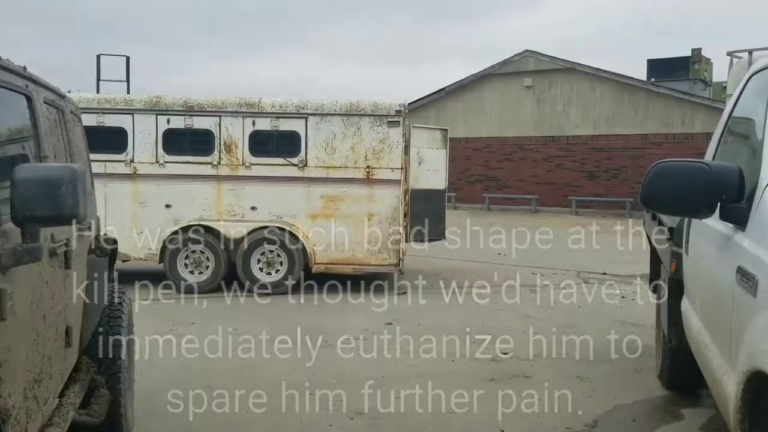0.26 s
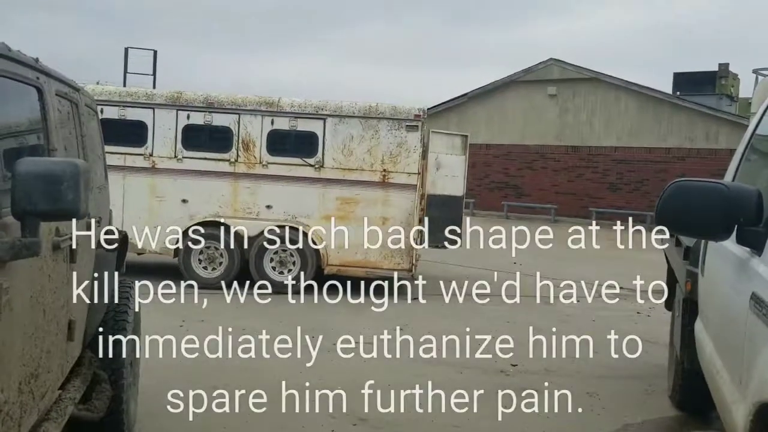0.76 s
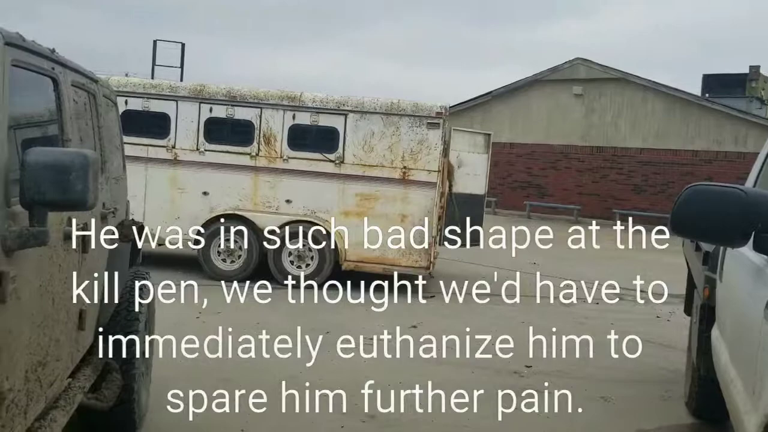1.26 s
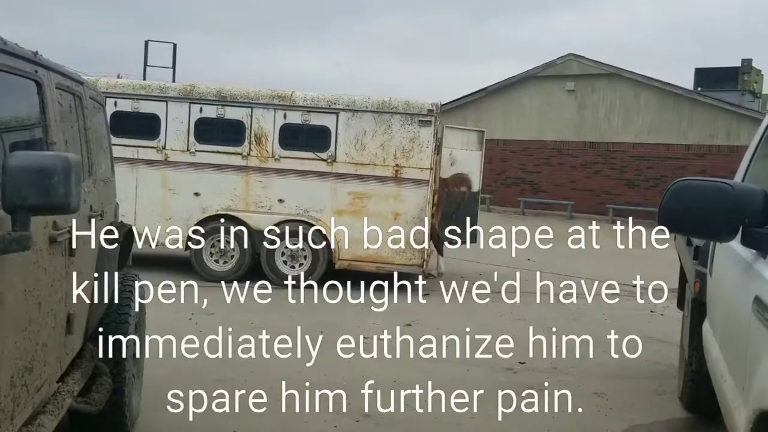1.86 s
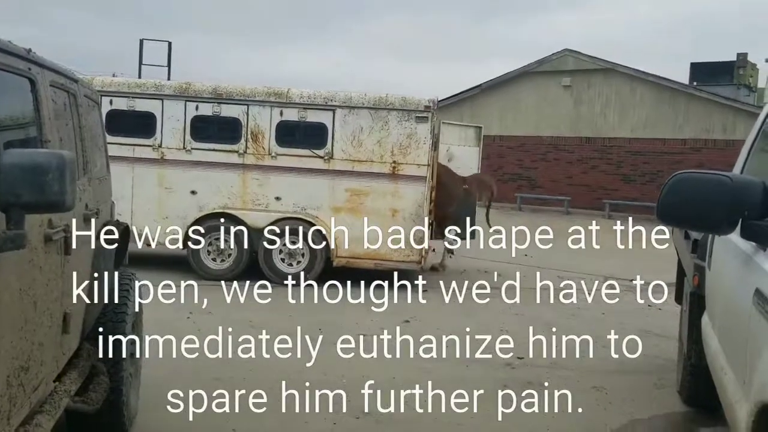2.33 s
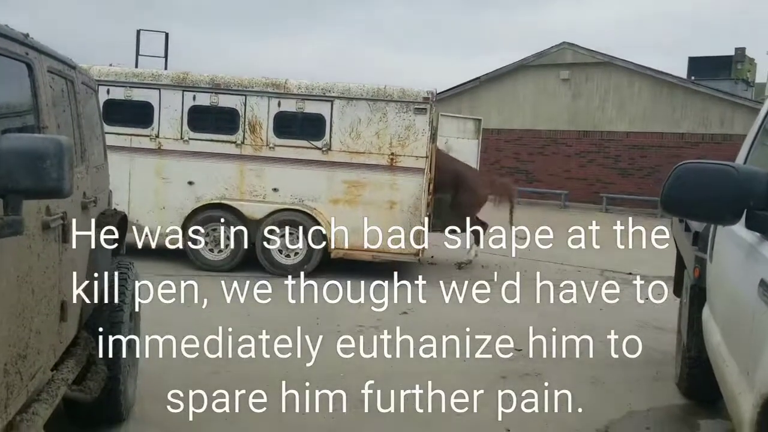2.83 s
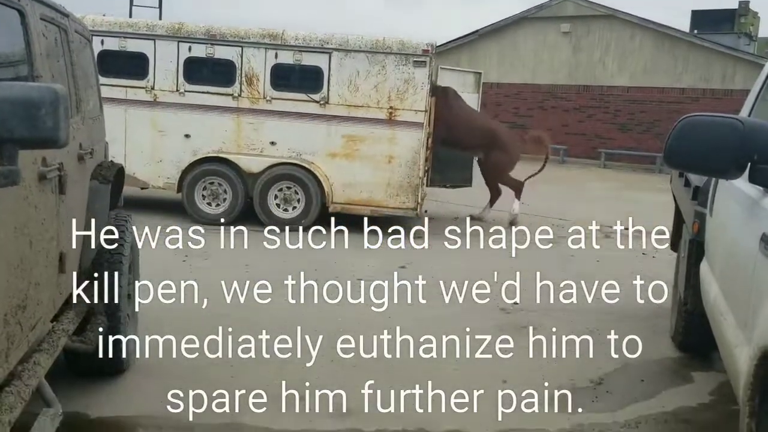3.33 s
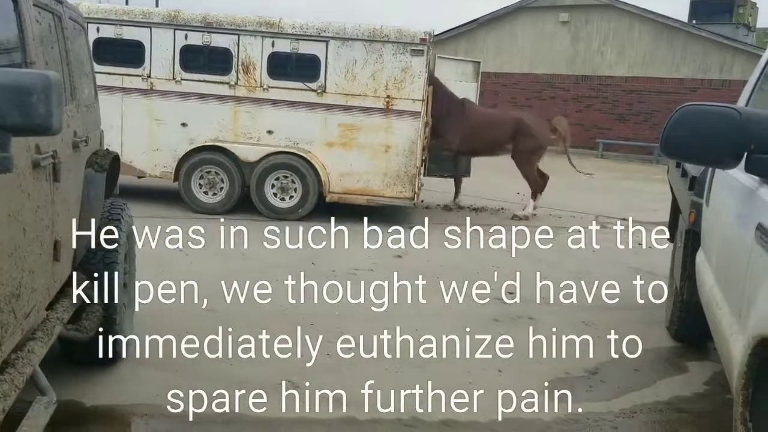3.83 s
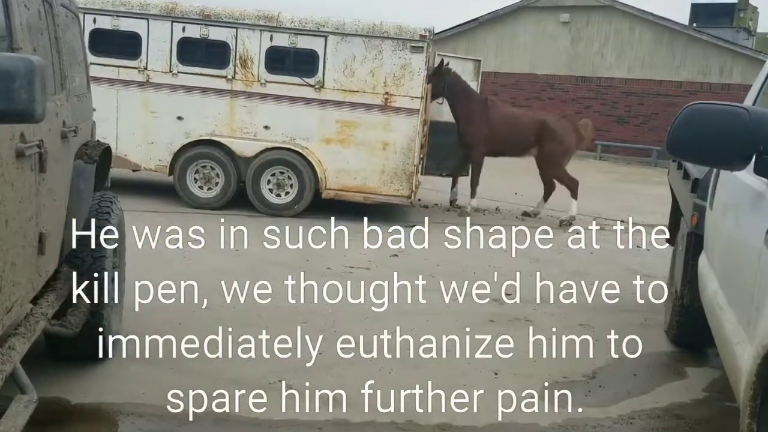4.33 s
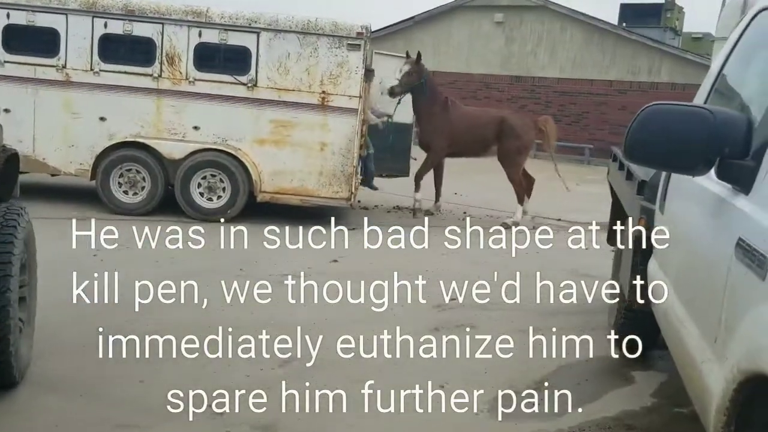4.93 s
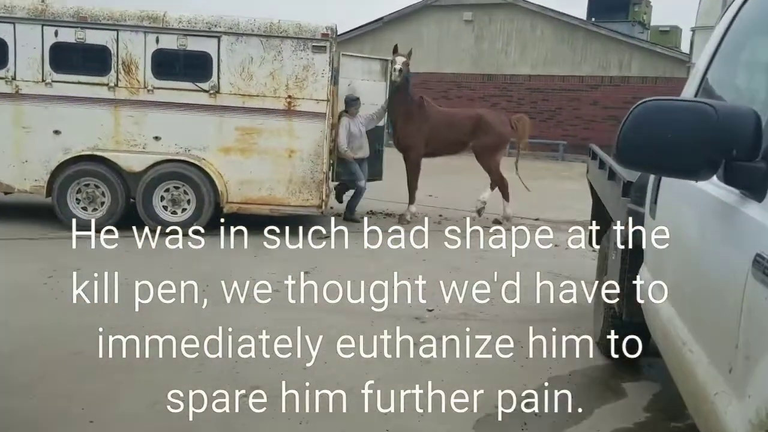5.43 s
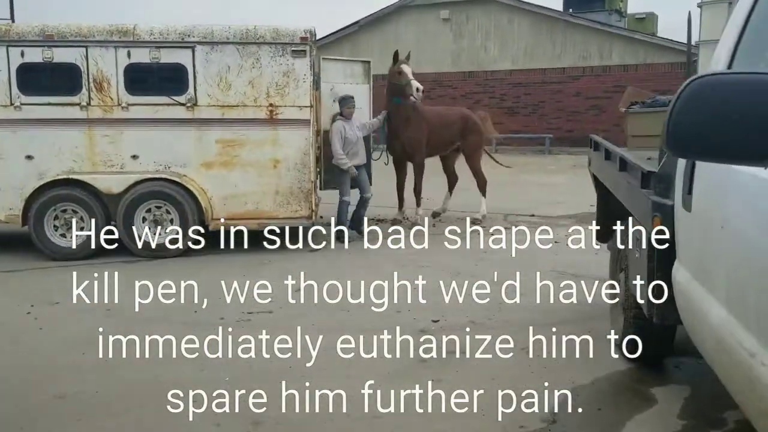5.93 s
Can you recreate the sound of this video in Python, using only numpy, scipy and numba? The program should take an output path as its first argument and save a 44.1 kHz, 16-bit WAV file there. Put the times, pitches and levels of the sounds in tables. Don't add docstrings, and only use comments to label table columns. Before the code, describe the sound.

Handheld phone in an open yard with a faint engine idle and thin hiss. Hooves knock on a trailer floor, with one hard double bang on metal panels near one second and latch clinks. A horse to the left squeals, breaks into a shaken trill and sinks to a low fluttering nicker. After a pause, a second horse ahead whinnies, still calling at the cut.

```python
import sys
import numpy as np
from scipy import signal
from scipy.fft import rfft, irfft
from scipy.io import wavfile
from scipy.ndimage import uniform_filter1d
from numba import njit

SR = 44100
rng = np.random.default_rng(int(sys.argv[2]) if len(sys.argv) > 2 else 0)


def to_wav(s):
    ch = np.atleast_2d(s).T
    pcm = np.round(np.clip(ch, -1, 1) * 32767)
    wavfile.write(sys.argv[1], SR, pcm.astype(np.int16))


def voltage_ratio(level):
    return 10 ** (np.asarray(level, float) / 20)


N = 273067


def unit(x):
    return x / np.sqrt(np.mean(x ** 2))


def curves(table):
    s, *columns = np.transpose(table)
    return [np.interp(np.arange(N) / SR, s, c) for c in columns]


@njit
def svf(x, hz, width):
    y, b, l = np.empty(len(x)), 0., 0.
    for i in range(len(x)):
        g, k = np.tan(np.pi * hz[i] / SR), width / hz[i]
        v = (b + g * (x[i] - l)) / (1 + g * (g + k))
        b, l, y[i] = 2 * v - b, l + 2 * g * v, k * v
    return y


def band(x, hz, width):
    hz = hz * np.ones(N)
    once = svf(x, hz, 1. * width)
    return unit(svf(once, hz, 1. * width))


def colour(points, size):
    f = np.arange(size // 2 + 1) * SR / size + 1
    hz, db = np.transpose(points)
    gain = voltage_ratio(np.interp(np.log(f), np.log(hz), db))
    return unit(irfft(rfft(rng.standard_normal(size)) * gain, size))


def walk(rate, size=N):
    k = int(SR / rate)
    steps = np.repeat(rng.standard_normal(size // k + 1), k)
    return 1.314 * uniform_filter1d(uniform_filter1d(steps, k), k)[:size]


def late(x, samples):
    return irfft(rfft(x) * np.exp(-2j * np.pi * samples * np.arange(N // 2 + 1) / N), N)


def ports(x, lag, pan_db, echoes):
    sides = (x * voltage_ratio(pan_db / 2), late(x, lag) * voltage_ratio(-pan_db / 2))
    return np.array([side + late(side, d) * voltage_ratio(db) for side, (d, db) in zip(sides, echoes)])


# time in seconds, rumble in dB, idle note in dB.
ENGINE = [
    (0, -40.5, -6.5),
    (.8, -43, -5),
    (1.25, -42, 8),
    (1.45, -45.5, -2.5),
    (3.3, -46, 0.5),
    (4.7, -54.5, -4),
    (5.15, -53, -4),
    (5.6, -50.5, 9.5),
    (6.19, -53.5, 9.5),
]
# frequency in Hz, level in dB.
RUMBLE = [(15, -46), (25, -33), (36, -24.5), (54, -8), (120, -1.5), (279, -11), (314, -18), (348, -21.5),
          (400, -23), (520, -72), (880, -120)]
# frequency in Hz, level in dB.
HISS = [(150, -8), (220, -2.5), (400, -12), (1100, -13.5), (2200, -21), (3200, -33), (5000, -38.5),
        (7700, -40.5), (8300, -54.5), (14500, -43.5)]
# time in seconds, pitch in Hz, tone in dB, rubbing noise in dB.
SQUEAL = [
    (0, 5800, -58, -64),
    (.15, 5820, -55, -63),
    (.3, 5814, -44, -69),
    (.42, 5790, -60, -59),
    (.65, 5830, -83, -82),
]


def yard():
    t = np.arange(N) / SR
    rumble_db, note_db = curves(ENGINE)
    idle_note = band(rng.standard_normal(N), 79.6, 12.0)
    rumble = colour(RUMBLE, N) * voltage_ratio(2 * walk(3)) + voltage_ratio(note_db) * idle_note
    rumble = rumble * voltage_ratio(rumble_db)

    hz, tone_db, rub_db = curves(SQUEAL)
    tone = band(rng.standard_normal(N), hz, 45) * voltage_ratio(tone_db - 3)
    rub = band(rng.standard_normal(N), 3900, 1000) * voltage_ratio(rub_db)
    squeal = (tone + rub) * (t < .7)

    hiss_db = -47 + 0.84 * (rumble_db + 46.0)
    common = colour(HISS, N)
    no_lows = signal.butter(1, 500, 'high', fs=SR, output='sos')
    unlike = signal.sosfilt(no_lows, colour(HISS, N))
    hiss = (common + unlike * np.array([[1], [-1]])) * voltage_ratio(hiss_db + walk(5.21))
    low = signal.sosfiltfilt(signal.butter(2, 3500, fs=SR, output='sos'), hiss)
    lull_db = -6 * np.clip((t - 1.9) / 0.097, 0, 1)
    hiss = low + (hiss - low) * voltage_ratio(lull_db)
    return (rumble + squeal + hiss) * voltage_ratio([[1.2], [-1.2]])


def ring(modes, t, stretch):
    hz, db, t60 = np.transpose(modes)[:, :, None]
    level_luck, pitch_luck, phase_luck = rng.standard_normal((3, len(modes), 1))
    decay = np.log(1000) / np.minimum(t60, .5) / stretch
    poles = 2j * np.pi * hz * (1 + 0.0213 * pitch_luck) - decay
    turns = np.cumprod(np.repeat(np.exp(poles / SR), len(t), axis=1), axis=1)
    y = (voltage_ratio(db + 2.6 * level_luck) * np.exp(1j * phase_luck) * turns).imag.sum(0)
    return y / np.sqrt(np.mean(y[:660] ** 2))


# frequency in Hz, level in dB, ring time (60 dB fall) in seconds.
FLOOR_MODES = [(56, -3.5, 0.43), (78.7, 3, 0.21), (115.5, -2, 1), (174, -3, 0.64), (227.6, -4.5, 0.22),
               (285, -8, 0.27)]
# frequency in Hz, level in dB, ring time in seconds.
PANEL_MODES = [(410, -7, 0.54), (560, 0, 0.82), (680, -0.5, 0.87), (800, -34.5, 0.5), (1020, -7, 0.26),
               (1062, 6, 0.66), (1122, -0.5, 0.52), (1360, -20.5, 0.11), (1330, -17, 0.26), (1740, 0, 0.11),
               (1905, 4, 0.13), (2015, -17, 0.61), (2680, -25.5, 0.55), (3110, -19, 0.38)]
# frequency in Hz, level in dB, ring time in seconds.
LATCH_MODES = [(2600, -6, 0.13), (3560, -4, 0.24), (3880, 9.5, 0.07), (4540, -15, .22), (4770, -5, .12),
               (5840, -3, 0.15), (7000, 2.5, 0.12)]
# start in seconds, floor thud in dB, wall panels in dB,
# ring time in seconds.
STAMPS = [(0.418, -26, -26, 0.46), (0.502, -27, -32, 0.16), (0.668, -26.5, -44, 0.21),
          (1.014, -23, -27.5, 0.63), (1.025, -25, -23.5, .13), (1.034, -20, -12, 0.29),
          (1.039, -32, -11, 0.11), (1.049, -17.5, -21.5, .12), (1.567, -22, -25.5, 0.49),
          (1.683, -23, -27, .15), (1.775, -27.5, -35, 0.13), (1.81, -26, -37, 0.18),
          (2.193, -27, -32.5, 0.42), (2.25, -33, -42, 0.48), (2.292, -24.5, -30.5, 0.038),
          (2.503, -34, -48, 0.2), (2.544, -33, -35, 0.063), (2.597, -22.5, -28, .22),
          (2.844, -30, -33.5, 0.062), (3.085, -28.5, -28, 0.3), (3.14, -24, -34.5, 0.18),
          (3.323, -25.5, -35.5, .11), (3.767, -31, -25, 0.16), (4.873, -37, -43, .19),
          (5.61, -36, -50, .11), (5.938, -29.5, -53, 0.087)]
# start in seconds, latch and grit in dB,
# wall panels in dB, ring time in seconds, rise time in ms.
RATTLES = [(0.707, -46.5, -43, 0.18, 0.86), (1.034, -38, -24.5, 0.43, 0.76), (1.569, -40, -49, 0.46, .6),
           (1.611, -25, -28.5, 0.37, 0.85), (1.73, -52.5, -34, 0.8, 7), (1.776, -49, -40, 0.56, 0.77),
           (2.268, -42, -53, 0.42, 10.4), (2.725, -43.5, -63, 0.32, .6), (4.304, -51, -37, .06, 0.65),
           (4.528, -25, -49, 0.25, 10.6), (4.589, -49, -47, 0.045, .6), (4.8, -57, -55, 0.28, 7.9),
           (4.875, -60.5, -67.5, 0.53, 0.79), (5.097, -57, -61, 0.14, 0.91), (5.15, -51.5, -62, 0.79, 12),
           (5.28, -43, -65, 0.34, 10)]


def trailer():
    out, t = np.zeros((2, N + SR)), np.arange(20000) / SR
    blows = [(s, thud_db, db, db - 29, t60, 0.38) for s, thud_db, db, t60 in STAMPS]
    blows += [(s, db, db, latch_db, t60, ms) for s, latch_db, db, t60, ms in RATTLES]
    crack = voltage_ratio(4) * np.sin(2 * np.pi * 1900 * t) * np.exp(-t / .0011)
    for s, thud_db, panel_db, latch_db, t60, rise_ms in blows:
        rise = 1 - np.exp(-(1000 * t / rise_ms) ** 2)
        fade = 1000 ** (-t / t60)
        clatter = voltage_ratio(2.5 * walk(150, size=len(t)))
        thud = ring(FLOOR_MODES, t, 4 * t60) * voltage_ratio(thud_db - 7.5)
        rattle = colour([(200, -0.5), (600, 13), (1800, 3.0), (3000, -16.0), (6000, -49.0)], len(t))
        k = int(s * SR)
        for ch, gain_db in enumerate((1.0, -1.0)):
            own = colour([(400, -16.0), (1500, 7.5), (2500, -2.5), (6000, -42.0)], len(t))
            panel = 0.66 * ring(PANEL_MODES, t, 1.84 * t60)
            panel = panel + (0.91 * rattle + 0.5 * own) * fade * clatter + crack
            grit = colour([(1500, -9.0), (3500, -3.5), (7000, -9.0), (8500, -16 + rise_ms),
                           (14500, -22 + 0.82 * rise_ms)], len(t))
            latch = .55 * ring(LATCH_MODES, t, 2.2 * t60)
            latch = latch + .75 * grit * clatter * (fade ** 2.2 + .12 * fade ** .75)
            blow = thud + panel * voltage_ratio(panel_db - 5.0) + latch * voltage_ratio(latch_db + 5.0 + 2 * gain_db)
            out[ch, k:k + len(t)] += blow * rise * voltage_ratio(gain_db)
    return out[:, :N]


# start in seconds, peak in dB, centre in Hz.
TICKS = [(0.418, -27, 3020), (0.503, -40, 996), (0.685, -41, 5500), (0.707, -20.5, 2700),
         (0.7075, -29, 6560), (1.684, -18, 1500), (1.776, -22, 2200), (1.783, -40, 5500),
         (2.293, -28, 1800), (4.305, -18, 2800), (4.427, -32, 2503), (4.588, -28, 3000), (4.874, -54, 2980),
         (5.149, -37, 2515)]


def ticks():
    out, t = np.zeros(N + SR), np.arange(400) / SR
    for s, db, hz in TICKS:
        k = int(s * SR)
        out[k:k + len(t)] += voltage_ratio(db - 3) * np.sin(2 * np.pi * hz * t) * np.exp(-t / .0007)
    return out[:N] * voltage_ratio([[1.0], [-1.0]])


def walls(x, t60, wet_db):
    t = np.arange(SR // 2) / SR
    sides = []
    for _ in range(2):
        tail = colour([(60, -10.0), (300, 8.0), (2000, -2.5), (5000, -10.5), (12000, -12.5)], len(t))
        tail = tail * 1000 ** (-t / t60) * (t > .012)
        sides.append(signal.fftconvolve(x, tail / np.sqrt(np.sum(tail ** 2)))[:N])
    return np.array(sides) * voltage_ratio(wet_db)


def heave_flanks(hz, heaves, pull, start, square, sag):
    hoot, dip, rise_db, stolen = np.zeros((4, N))
    wobble = .07 * walk(75)
    kept, lock_hz, weak_s, drop, spread = pull
    for s, half, hoot_hz, hoot_db, up_db in heaves:
        near = slice(int((s - .15) * SR), min(int((s + .3) * SR), N))
        t = np.arange(near.start, near.stop) / SR - s
        heave = np.exp(-np.abs(t / half / spread) ** square)
        puff = np.exp(-np.abs(t / half) ** 5)
        stolen[near] += puff * np.clip((hoot_db + 43.5) / 18, 0, 1)
        reach = np.clip((half - weak_s) / .003, 0, 1)
        recovery = np.exp(-np.maximum(t - half, 0) / .06) * (t > 0)
        hz[near] -= reach * drop * (s - start) ** 2 * recovery
        hz[near] += reach * heave * (kept * hz[near] + lock_hz - hz[near])
        dip[near] += heave
        rise_db[near] += up_db * puff
        tired = sag * (s - start) ** 2 * max(hoot_hz - 250, 0)
        bent_hz = hoot_hz - tired * (2.5 * np.clip(t, -.1, .1) + wobble[near])
        turn = 2 * np.pi * np.cumsum(bent_hz) / SR
        tone = np.sin(turn) + np.sin(2 * turn) * (250 / hoot_hz) ** 3
        hoot[near] += puff * voltage_ratio(hoot_db) * tone * np.sqrt(2)
    return hz, hoot * voltage_ratio(2.5 * walk(90)), dip, rise_db, stolen


def whistle_tone(hz, loss_db, dip, mouth, overtones_db, flutter_db):
    phase = 2 * np.pi * np.cumsum(hz) / SR
    mouth_hz, mouth_db = np.transpose(mouth)
    whistle = 0
    for k, db in enumerate(overtones_db):
        patchy_db = flutter_db * (.8 + .7 * (k > 0)) * walk(40)
        passed_db = np.interp((k + 1) * hz, mouth_hz, mouth_db)
        level_db = db - k * (loss_db + dip) + passed_db + patchy_db
        whistle = whistle + voltage_ratio(level_db) * np.sin((k + 1) * phase)
    return np.sqrt(2) * whistle


def fold_slaps(growl_hz):
    gap_luck, level_luck = rng.standard_normal((N // 40, 2)).T
    at = np.cumsum(SR / growl_hz * np.exp(.4 * gap_luck)).astype(int)
    slaps = np.zeros(N)
    slaps[at[at < N]] = voltage_ratio(3.5 * level_luck[at < N])
    return slaps, unit(signal.lfilter([1], [1, -.99], slaps))


def throat_noise(slaps, chop, breath_db, growl_db, dip, rise_db, throat, notches, squeeze, gust):
    air = rng.standard_normal(N) * (.85 + chop * .35)
    puffs = .8 * unit(slaps) + (.2 + chop) * rng.standard_normal(N)
    noise = 0
    for f, w, air_db, puff_db in throat:
        centre = f * (1 + squeeze * (dip - .4) + .014 * walk(30))
        lift = voltage_ratio(rise_db * (1 + gust * (f > 5000)) + 4.1 * walk(35))
        noise = noise + lift * voltage_ratio(air_db + breath_db) * band(air, centre, w + .018 * f)
        noise = noise + lift * voltage_ratio(puff_db + growl_db - 7) * band(puffs, centre, 1.25 * w + .045 * f)
    for f, w in notches:
        noise = noise - svf(noise, f * (1 + 0.013 * walk(35)), 1. * w)
    return noise


def horse(call, airflow, heaves, pull, throat, mouth, overtones_db, notches, square, dip_db, flutter_db,
          growl_hz, sag, squeeze, gust, hush=(0, 0)):
    t = np.arange(N) / SR
    hz, whistle_db, loss_db = curves(call)
    breath_db, growl_db = curves(airflow)
    start, end = airflow[0][0], airflow[-1][0]
    hz, hoot, dip, rise_db, stolen = heave_flanks(hz, heaves, pull, start, square, sag)
    shaky = .0013 + .016 * dip * (dip_db < 0)
    hz = uniform_filter1d(hz, 220) * (1 + shaky * walk(110))
    whistle = whistle_tone(hz, loss_db, dip, mouth, overtones_db, flutter_db)
    whistle = whistle * voltage_ratio(uniform_filter1d(whistle_db, 400) + dip_db * stolen)
    whistle = whistle * (1 + 0.72 * hoot)
    slaps, chop = fold_slaps(growl_hz)
    noise = throat_noise(slaps, chop, breath_db, growl_db, dip, rise_db, throat, notches, squeeze, gust)
    hoot = hoot * ((t < hush[0]) | (t > hush[1]))
    tiredness = np.clip((t - start) / 2, 0, 1) ** 3
    hoot = hoot * (1 + tiredness * (uniform_filter1d(chop, 40) - 1.2) * .7)
    on = (t > start) * np.clip((end + .04 - t) / .04, 0, 1)
    return on * (whistle + hoot + noise)


# time in seconds, pitch in Hz, level in dB,
# dB lost per overtone.
LEFT_SQUEAL = [
    (2.48, 1330, -75, 24.5),
    (2.505, 1400, -37, 7),
    (2.545, 1478, -26, 8),
    (2.575, 1585, -30.5, 3.5),
    (2.62, 1612, -34.5, 1),
    (2.7, 1711, -21.5, 3),
    (2.84, 1776, -19.5, 4.5),
    (2.89, 1764, -18.5, 6),
    (2.93, 1724, -24, 1.5),
    (3.0, 1695, -30, 2.5),
]
# time in seconds, pitch in Hz, level in dB, dB lost per overtone.
LEFT_TRILL = [(3.018, 1584, -23.5, 2.4), (3.039, 1428, -27, 3), (3.105, 1396, -27.5, 2.97),
              (3.149, 1334, -23.5, 7.3), (3.2, 1346, -29, 3.2), (3.25, 1425, -26.5, 3.7),
              (3.3, 1529, -28, 0.38), (3.4, 1740, -19.5, 3.7), (3.51, 1820, -18.5, 4.5),
              (3.63, 1822, -19.5, 4.15), (3.753, 1823, -23, 5.5), (3.89, 1712, -23, 11),
              (4.02, 1574, -20, 7.4), (4.119, 1520, -50, 30)]
# time in seconds, breath in dB, growl in dB.
LEFT_AIR = [(2.48, -67, -77), (2.6, -52.5, -70), (2.95, -46.5, -62), (3.05, -34, -50.5), (3.35, -51.5, -68),
            (3.5, -43.5, -70), (3.65, -32, -48), (3.85, -29, -43), (4.001, -28, -37.5), (4.119, -42, -35.5),
            (4.4, -52, -42.5), (4.6, -58.5, -46), (4.759, -70, -58)]
# centre in seconds, half length in seconds, hoot pitch in Hz,
# hoot level in dB, rise of breath and growl in dB.
LEFT_HEAVES = [(3.153, 0.031, 495, -42, 6), (3.253, 0.024, 498, -52, 14), (3.342, 0.021, 505, -51, 16),
               (3.449, 0.026, 501, -36, 20.5), (3.564, 0.03, 509, -29, 13), (3.69, 0.029, 514.5, -26, 5),
               (3.822, 0.031, 491.3, -22.5, 1), (3.956, 0.039, 430, -24, -3.5),
               (4.009, 0.0053, 560, -41, 0.5), (4.074, 0.0163, 484.5, -30, -1),
               (4.114, 0.022, 331, -34, 0.5), (4.184, 0.049, 458, -30.5, 7), (4.26, 0.017, 290, -37, -1),
               (4.307, 0.0044, 400, -39.5, 11.5), (4.347, 0.035, 421, -35.5, 10.5),
               (4.435, 0.014, 390, -52, 8.5), (4.483, 0.019, 300, -33.5, 12), (4.529, 0.028, 390, -31, 8.5),
               (4.587, 0.013, 400, -37, 7.5), (4.641, 0.03, 400, -40, 4.5), (4.705, 0.055, 252.5, -38, 5.5)]
# share of pitch kept, Hz added, longest heave too weak to pull in
# seconds, later drop in Hz per second squared, width of the pull in heave lengths.
LEFT_PULL = (.88, 0, 0, 0, 1.1)
# frequency in Hz, width in Hz, dB on breath, dB on growl.
LEFT_THROAT = [(290, 250, -28, 2), (452, 240, -25, 5), (1150, 400, -7, 5.5), (1693, 510, -0.5, -16),
               (2120, 154, 3.5, -20), (2935, 35, -2.5, 0.5), (3450, 170, -1, 3), (3240, 140, -3.5, -10.5),
               (3910, 500, -2, -28.5), (4577, 32, -1.5, -19), (5970, 2100, -4.5, -21),
               (11700, 5400, -12.5, -36)]
# frequency in Hz, level in dB.
LEFT_MOUTH = [(1100, -6), (1700, 0.5), (2100, 1.5), (2500, -14.5), (2900, -4), (3500, -0.5), (4300, 10.5),
              (4900, -2.5), (5500, -5.5), (7000, -4.5), (9000, -2), (14000, 7)]
LEFT_OVERTONES_DB = [-1, 5.5, -0.5, 6, -4, -8, -13, -16.5]
# frequency in Hz, width in Hz.
LEFT_NOTCHES = [(2360, 520), (850, 170), (5140, 250)]


def left_horse():
    return horse(LEFT_SQUEAL + LEFT_TRILL, LEFT_AIR, LEFT_HEAVES, LEFT_PULL, LEFT_THROAT, LEFT_MOUTH,
                 LEFT_OVERTONES_DB, LEFT_NOTCHES, square=2.65, dip_db=-12.5, flutter_db=2.38, growl_hz=112,
                 sag=.35, squeeze=-0.027, gust=0.059, hush=(NICKER[0][0], NICKER[-1][0]))


# time in seconds, level in dB.
NOSTRILS = [
    (3.4, -80),
    (3.45, -51),
    (4.0, -51),
    (4.2, -43),
    (4.45, -46),
    (4.6, -58),
    (4.8, -68.5),
    (4.85, -95),
]


def nostrils():
    t = np.arange(N) / SR
    level_db = curves(NOSTRILS)[0] + 1.2 * walk(15)
    hiss = band(rng.standard_normal(N), 11460, 7100) * voltage_ratio(level_db)
    return hiss * (t > NOSTRILS[0][0]) * (t < NOSTRILS[-1][0])


# time in seconds, pitch in Hz, level in dB.
NICKER = [(3.865, 588, -50), (3.889, 577.6, -43), (3.94, 505.5, -22.5), (3.962, 401, -29),
          (3.995, 510.7, -31), (4.036, 584.4, -41.5), (4.068, 500.5, -21.5), (4.09, 299.5, -35),
          (4.12, 249, -40), (4.15, 396.6, -30), (4.185, 484, -28.5), (4.21, 372.2, -31),
          (4.262, 240, -38.5), (4.299, 369, -32), (4.335, 270.5, -35), (4.37, 290, -34.5),
          (4.42, 237.3, -51)]


def nicker():
    t = np.arange(N) / SR
    hz, db = curves(NICKER)
    hz = uniform_filter1d(hz, size=300) * (1 + .07 * walk(70))
    turn = 2 * np.pi * np.cumsum(hz) / SR
    tone = np.sin(turn) + (250 / hz) ** 4 * np.sin(2 * turn)
    rough = voltage_ratio(db + 4 * walk(130))
    return np.sqrt(2) * tone * rough * (t > NICKER[0][0]) * (t < NICKER[-1][0])


# time in seconds, pitch in Hz, level in dB, dB lost per overtone.
AHEAD_WHISTLE = [(5.185, 1080, -50, 24), (5.225, 1374, -38, 28), (5.25, 1704, -16.5, 24),
                 (5.265, 1753, -14, 15), (5.3, 1779, -13.5, 26.4), (5.37, 1804, -38, 4.4),
                 (5.43, 1858, -21.5, 16), (5.48, 1865, -21.5, 7.1), (5.54, 1887, -17.5, 23),
                 (5.6, 1851, -13.5, 33), (5.72, 1945, -11.5, 28), (5.8, 1922, -14, 28),
                 (5.9, 1927, -17.5, 26), (6.02, 1925, -18.5, 33), (6.1, 1930, -21.5, 23),
                 (6.19, 1925, -24, 28)]
# time in seconds, breath in dB, growl in dB.
AHEAD_AIR = [(5.12, -65.5, -59.5), (5.2, -52, -41.5), (5.25, -41.5, -68), (5.45, -33.5, -69),
             (5.56, -31.5, -44), (5.85, -35, -45), (5.95, -40.5, -48), (6.12, -44.5, -49.5),
             (6.19, -43, -42.5)]
# centre in seconds, half length in seconds, hoot pitch in Hz,
# hoot level in dB, rise of breath and growl in dB.
AHEAD_HEAVES = [
    (5.501, .019, 480, -42, 1.6),
    (5.605, .026, 505, -34.5, 2.5),
    (5.722, .036, 516, -31, 4),
    (5.873, .032, 503, -34.5, 4.5),
    (6.013, .042, 520, -35, 6),
    (6.064, .012, 640, -37, 2),
    (6.161, .026, 510, -36, 5),
    (6.178, .018, 290, -35, 1.5),
]
# share of pitch kept, Hz added, longest heave
# too weak to pull in seconds, later drop in Hz per second squared, width of the pull in heave lengths.
AHEAD_PULL = (0, 2052, .021, 290, 1)
# frequency in Hz, width in Hz, dB on breath, dB on growl.
AHEAD_THROAT = [(539, 200, -14, 6), (1199, 79, -2, 13), (1673, 200, 3, 10), (2182, 104, 4.5, -18),
                (2303, 63, 0, -19), (3260, 150, -5, -19), (3474, 250, -5, -19), (4205, 780, -7, -21),
                (2580, 450, -5.5, -12), (5550, 290, -15, -21), (7200, 3000, -13, -37.5),
                (12000, 2200, -17.5, -33)]
# frequency in Hz, level in dB.
AHEAD_MOUTH = [(1100, -27), (1800, 4.5), (2060, 1.5), (3500, -3.5), (3900, 3.5), (4150, 6), (5250, -7),
               (5600, -7), (6000, -6), (7500, -9)]
AHEAD_OVERTONES_DB = [-2, -4.5, 5, 9]
# frequency in Hz, width in Hz.
AHEAD_NOTCHES = [(2840, 390), (4900, 170), (820, 81)]


def ahead_horse():
    return horse(AHEAD_WHISTLE, AHEAD_AIR, AHEAD_HEAVES, AHEAD_PULL, AHEAD_THROAT, AHEAD_MOUTH,
                 AHEAD_OVERTONES_DB, AHEAD_NOTCHES, square=7.0, dip_db=4.4, flutter_db=2.9, growl_hz=140,
                 sag=2.1, squeeze=0.0097, gust=1.24)


def scene():
    knocks = trailer() + ticks()
    left = left_horse() + nostrils() + nicker()
    ahead = ahead_horse()
    near = ports(left, 16.7, 4.65, [(210, -12.0), (330, -6.0)])
    near[1] = signal.lfilter([.48], [1, -.52], near[1])
    far = ports(ahead, -1.07, 0.92, [(12, -5.5), (260, -18.0)])
    treble = np.diff(left + ahead, prepend=0) * 2.66
    echoes = walls(treble, 0.21, -8.0) + walls(knocks.mean(0), 0.43, -17.5)
    return yard() + knocks + near + far + echoes


def low_pass(x):
    return signal.sosfilt(signal.butter(12, 14800, fs=SR, output="sos"), x)


def record(dry):
    soft = .99 * np.tanh(dry ** 3 / 3 + dry)
    mix = signal.sosfilt(signal.ellip(8, .2, 70, 14500, fs=SR, output='sos'), soft)
    return low_pass(mix)


dry = scene()
out = record(dry)
to_wav(out)
```